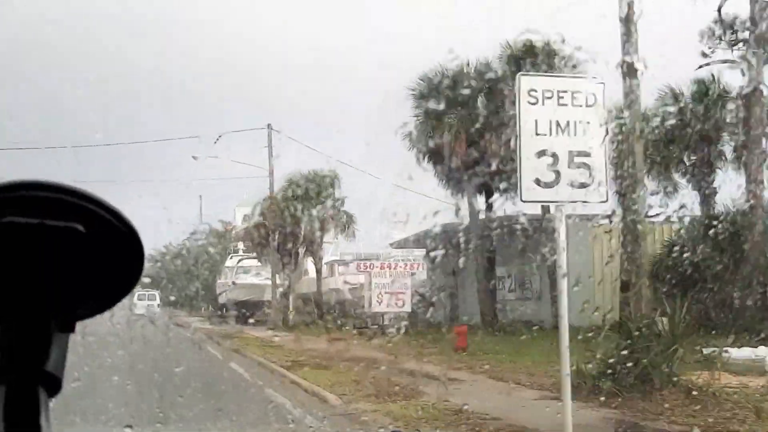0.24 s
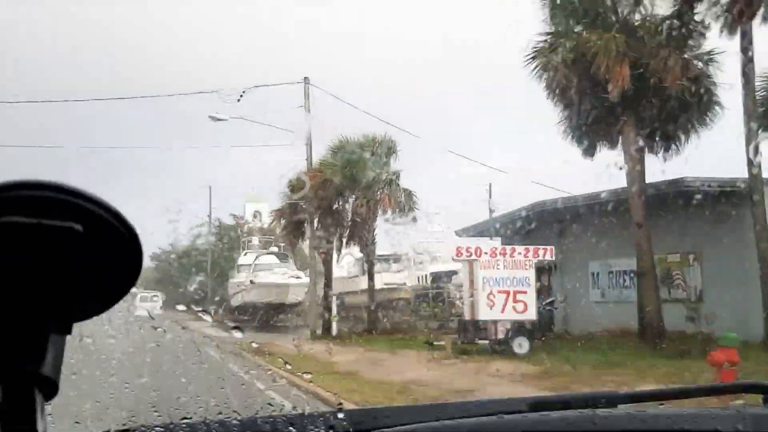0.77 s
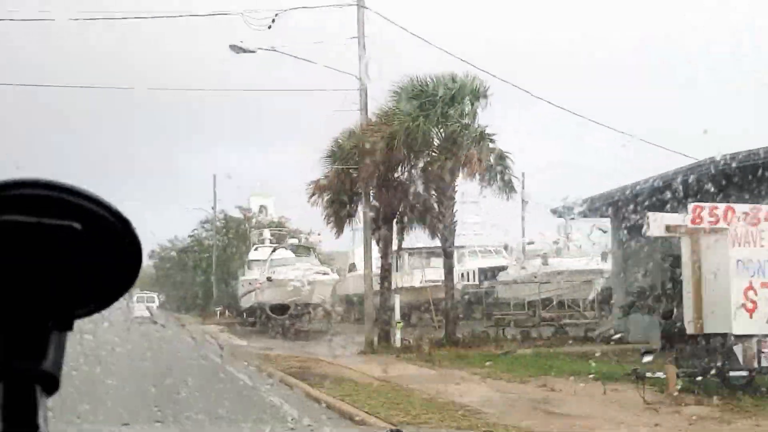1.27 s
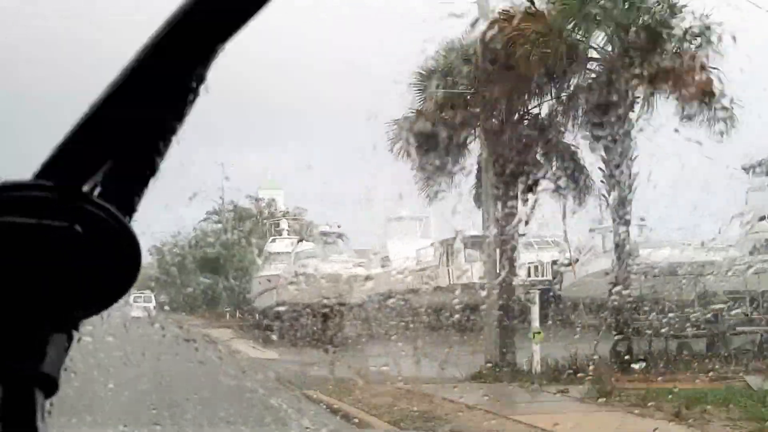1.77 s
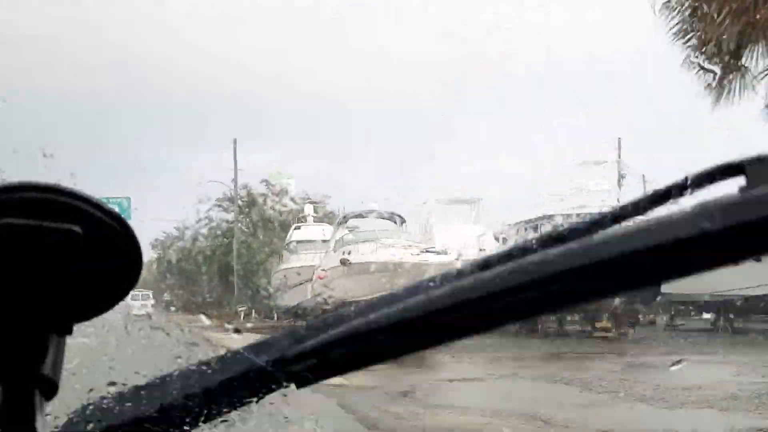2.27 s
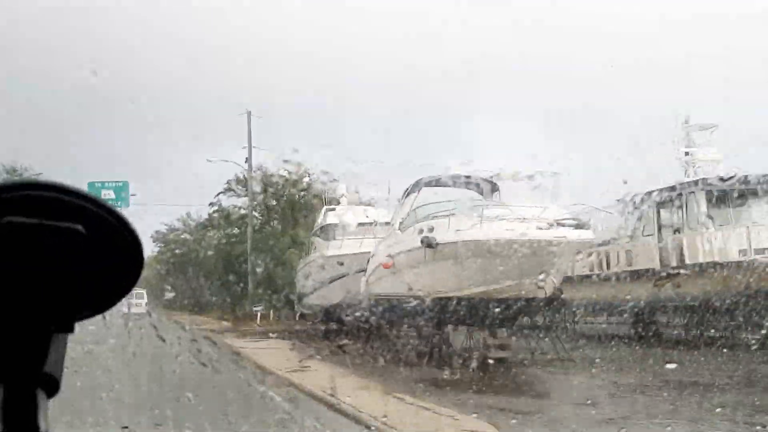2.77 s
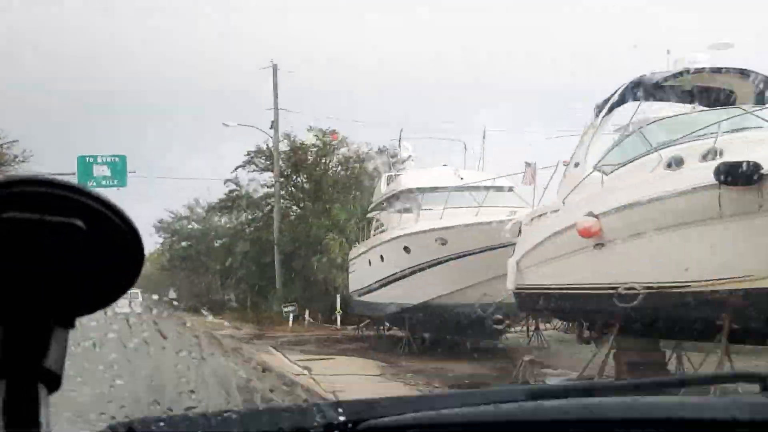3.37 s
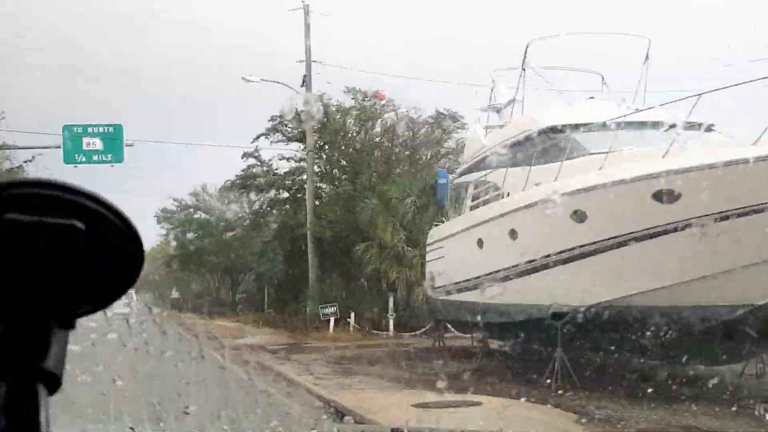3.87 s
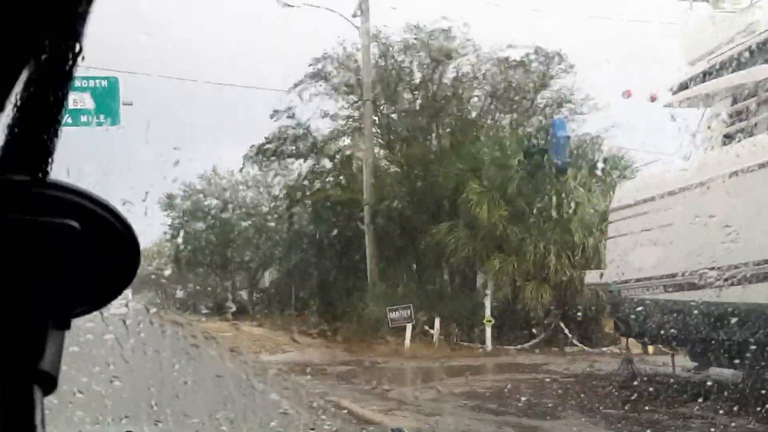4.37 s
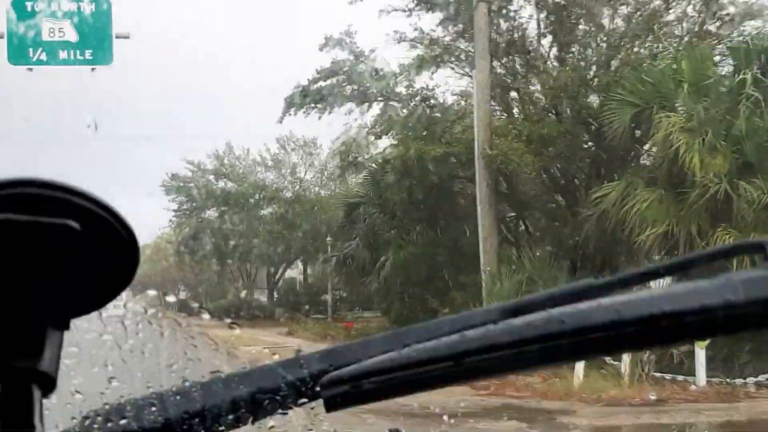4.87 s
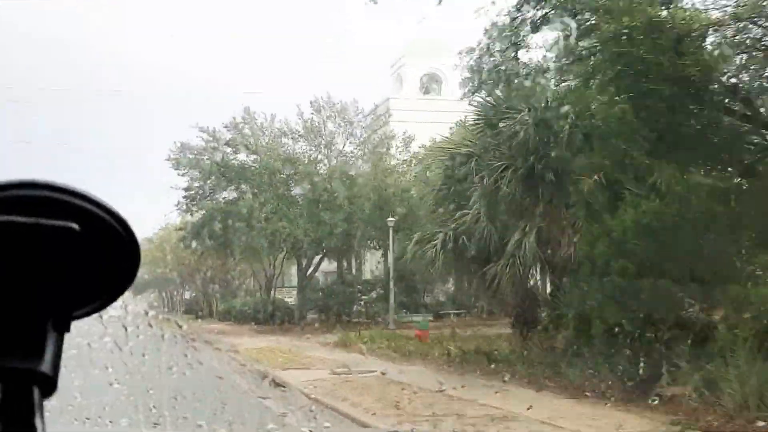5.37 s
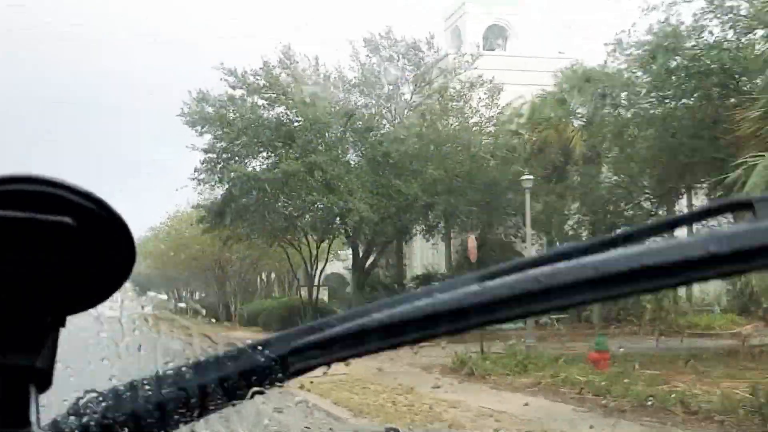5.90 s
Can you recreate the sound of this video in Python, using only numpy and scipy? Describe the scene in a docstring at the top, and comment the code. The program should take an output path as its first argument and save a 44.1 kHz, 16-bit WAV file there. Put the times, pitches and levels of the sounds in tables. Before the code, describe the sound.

Inside a moving car in steady rain, drops patter and sizzle on the glass over wet tyre wash, low rumble, a steady hum and road thuds.

```python
"""Inside a car driving through heavy rain on a wet road, heard in stereo.
Rain: thousands of random clicks, coloured by the glass, tick and sizzle in gusts; fat drops splat on top.
Road: shaped noise makes the tyre wash and the rumble; low resonances boom on rough patches, seams thud.
A wiper chirps once, as a short burst of ringing noise. The drive train hums, as sines at multiples
of one turning speed."""
import sys
import numpy as np
from scipy import signal
from scipy.fft import rfft, irfft
from scipy.io import wavfile
from scipy.ndimage import uniform_filter1d

SR = 44100
rng = np.random.default_rng(int(sys.argv[2]) if len(sys.argv) > 2 else 0)


def pcm_store(signal):
    """Save signal as 16-bit PCM."""
    levels = np.round(np.clip(np.atleast_2d(signal), -1, 1) * 32767)
    wavfile.write(sys.argv[1], SR, levels.astype(np.int16).T)


N = 270774
TIME = np.arange(N) / SR  # seconds

# Strength of the rain over time. Each row: time in seconds, level of the patter in dB.
RAIN_STRENGTH = [(0, -35), (.2, -38), (.55, -36), (.72, -38.5), (1.03, -37), (1.34, -41.5), (1.46, -37),
                 (1.65, -37), (2.0, -39.5), (2.65, -37.5), (3.6, -37), (3.8, -39), (4.33, -38),
                 (4.44, -40.5), (4.92, -43), (5.05, -39.5), (5.65, -41), (6.14, -39)]
# Gusts fling a sheet of drops at the glass, or hold it off. Each row: time in seconds, change in dB.
GUSTS = [(1.325, -2.5), (1.64, 1.5), (2.22, 2), (4.26, 2.5), (4.73, 5), (5.79, 3), (5.93, 1.5), (6.0, -2.5),
         (6.069, 4.5)]
# Sizes of drops. Each row: drops per second, average spread of strength in dB, share in dB.
DROP_SIZES = [(9160, 2.9, -0.5), (798, 2.5, -3.3)]
# Tone of the ticking drops. Each row: frequency in Hz, strength in dB.
PATTER_SPECTRUM = [(400, -24), (900, -8), (1300, -1), (1800, -4.5), (2600, 0), (3500, 0.5), (4500, 0),
                   (5500, -3), (6800, -7.5), (8100, -6), (8700, -17.5), (11000, -14.5), (16000, -33)]
# Tone of the fine sizzle as drops burst. Each row: frequency in Hz, strength in dB.
SPRAY_SPECTRUM = [(2000, -25), (5000, -3), (8000, -6), (8800, -6), (10000, -4.5), (11700, 0.5),
                  (13500, 0.5), (16000, -3.5)]
# Resonances of the windscreen. Each row: frequency in Hz, width in Hz, gain in dB.
GLASS_MODES = [(1529, 64, 6), (2033, 86, 4.5)]
# Tiny sharp drops close by. One row: drops per second, average spread of strength in dB,
# level in dB against the sizzle.
SHARP_DROPS = (260, 4.4, -8)
# Tone of the tiny sharp drops. Each row: frequency in Hz, strength in dB.
SHARP_DROP_SPECTRUM = [(5000, -29), (9000, -9), (12000, 1), (16000, 1)]
# Fat drops on the glass. Each row: start in seconds, tick level in dB, sizzle level in dB,
# left over right in dB.
FAT_DROPS = [(.732, -39, -40, 1), (0.9823, -36, -31, 11), (2.37, -38, -39, 0), (4.357, -28, -48, 0),
             (4.5124, -33, -40, 5), (4.593, -31, -40, 2), (5.0, -35, -32, 1.5), (5.5256, -35, -34, 3),
             (5.7557, -32, -37, -1), (5.792, -36, -46, 2), (5.9194, -37, -31, 1)]
# Coarseness of the road. Each row: time in seconds, tyre wash in dB, rumble in dB.
ROAD_SURFACE = [(0, -37.5, -29.5), (.7, -36.5, -30.5), (1.0, -35.5, -28), (1.25, -38, -31.5),
                (2.1, -39, -32), (2.9, -36.5, -28.5), (3.7, -36.5, -33), (4.2, -36, -29), (4.7, -37, -31),
                (5.3, -37.5, -31.5), (6.14, -37.5, -29.5)]
# Tone of the tyre wash. Each row: frequency in Hz, strength in dB.
WASH_SPECTRUM = [(150, -12), (300, 3), (440, -0.5), (580, 2), (700, 1), (890, -0.5), (1050, -4.5),
                 (1250, -14), (2000, -17), (5000, -46)]
# Tone of the road rumble. Each row: frequency in Hz, strength in dB.
RUMBLE_SPECTRUM = [(12, -32), (24, -24), (70, -4.5), (102, -0.5), (130, -2), (175, -3), (210, -2),
                   (260, -5), (320, -9.5), (380, -16.5), (520, -19.5), (1000, -60)]
# Booming of the body and cabin air. Each row: frequency in Hz, width in Hz, gain in dB.
BOOM_MODES = [(46.2, 4.7, -7.5), (58.1, 5.1, -3.5), (75, 13, -32)]
# Rough patches. Each row: start of full strength in seconds, its length in seconds, boom in dB.
ROUGH_PATCHES = [(.8, .45, -21.5), (4.296, 0.58, -32), (4.47, 0.15, -24)]
# Dips in the road rock the body briefly. Each row: time in seconds, boom in dB.
DIPS = [(.21, -46), (1.95, -30), (2.35, -28), (3.24, -29), (3.66, -23), (5.61, -29)]
# Seams in the road. Each row: start in seconds, thud level in dB, knock level in dB.
SEAMS = [(0.206, -18.5, -29), (0.808, -18, -26), (.826, -27, -21), (0.857, -14.5, -25), (0.894, -38, -28),
         (1.025, -15, -45), (2.864, -41, -29), (3.504, -25, -23.5), (4.481, -18, -26.5)]
# Tones a wheel impact sets ringing. Each row: frequency in Hz, time to fade by 60 dB in seconds,
# level in dB against the thud.
THUD_MODES = [(58.6, .25, 0), (105.3, 0.35, -3), (124.4, 0.14, -2.5), (174, 0.053, -2)]
# Tone of the knocking trim. Each row: frequency in Hz, strength in dB.
KNOCK_SPECTRUM = [(100, -8), (295, 14), (370, 8), (480, 4.5), (850, -7.5), (1300, -10), (2500, -11),
                  (6000, -52)]
# Chirp of the wiper rubber. One row: frequency in Hz, width in Hz, level in dB.
WIPER_CHIRP = (1520, 680, -31)
# Turning speed of the drive train. Each row: time in seconds, turns per second in Hz.
TURNING_SPEED = [(0, 47.62), (1.2, 48.23), (2, 48.34), (2.95, 48.82), (3.75, 49.4), (4.65, 48.59),
                 (5.9, 47.9), (6.14, 47.9)]
# The hum's fifth order, which rings in the cabin. Each row: time in seconds, level in dB.
FIFTH_ORDER = [(0, -32.5), (1.8, -31.5), (2.95, -28), (3.35, -30), (3.8, -29), (5.1, -27), (5.55, -29),
               (5.9, -31), (6.14, -30.5)]
# Weaker orders of the hum. Each row: multiple of the turning speed, level in dB.
WEAK_ORDERS = [(1, -36.5), (2, -39.5), (3, -39.5), (6, -48.5), (8, -58)]

GUST_S, DIP_S = 0.023, 0.036  # seconds from the peak of a swell until it is down to 37 %
FLUTTER_DB, FLUTTER_HZ = 0.5, 14  # the rain's own unevenness
# The spray follows the patter: its level at a usual patter level, and dB per dB beyond that.
USUAL_PATTER_DB, SPRAY_DB, SPRAY_FOLLOWS = -38, -46.5, 1.1
PATCH_ATTACK_S, PATCH_RELEASE_S, SMOOTH_ROAD_BOOM_DB = 0.085, 0.12, -35
LEFT_LEAD_S = 0.00045  # sound from the left reaches the right microphone this much later
WIPER_CHIRP_S = 4.477  # start in seconds
FIFTH_WAVER_DB = 0.7
# The seventh order: its mean level, and dB lost per dB that the fifth grows.
SEVENTH_DB, SEVENTH_YIELDS = -43.5, 1.58
CUTOFF_HZ = 15900


def rain():
    """Each drop gives a dull tick through the glass and a fine sizzle as it bursts."""
    patter_db, spray_db = rain_levels()
    hits = sum(from_db(db) * drops(per_s, spread_db) for per_s, spread_db, db in DROP_SIZES)

    ticks = rms_one(cabin(hits, t60=0.065, wet_db=0.5, pan_db=12))
    # drops on roof and bonnet merge into a hiss
    far = from_db(-8.5) * stereo_noise(0) + from_db(-8) * from_the_left()
    ring = resonate(stereo_noise(0), GLASS_MODES)
    patter = colour(ticks + far + ring, PATTER_SPECTRUM)

    sizzle = colour(cabin(hits, t60=0.016, wet_db=-4, pan_db=25), SPRAY_SPECTRUM)
    per_s, spread_db, sharp_db = SHARP_DROPS
    sharp_hits = cabin(drops(per_s, spread_db), t60=0.012, wet_db=-10, pan_db=15)
    sharp = from_db(sharp_db) * colour(sharp_hits, SHARP_DROP_SPECTRUM)

    # both lean a little to the left
    return from_db(patter_db) * patter * pan(0.81) + from_db(spray_db) * (sizzle + sharp) * pan(2.8)


def rain_levels():
    """Patter and spray in dB: both follow the rain and its gusts; the spray flutters more."""
    strength_db, = in_time(RAIN_STRENGTH)
    gusts_db = sum(db * swell(s, GUST_S) for s, db in GUSTS)
    patter_db = strength_db + gusts_db + FLUTTER_DB * drift(FLUTTER_HZ)
    spray_db = SPRAY_DB + SPRAY_FOLLOWS * (patter_db - USUAL_PATTER_DB) + 0.9 * drift(FLUTTER_HZ)
    return patter_db, spray_db


def drops(per_s, spread_db, count=10):
    """Drops land at chance moments, as clicks of random strength dealt to patches across the glass."""
    chance = per_s * from_db(1.5 * drift(15)) / SR  # the rate itself wanders
    at = np.flatnonzero(rng.random(N) < chance)
    strength = from_db(spread_db * np.minimum(rng.exponential(1, N), 4.5))
    size = strength * rng.choice([-1, 1], N)
    patch = rng.integers(0, count, N)
    clicks = np.zeros((count, N))
    clicks[patch[at], at] = size[at]
    return rms_one(clicks)


def cabin(patches, t60, wet_db, pan_db):
    """Each patch of glass has its own direct path and its own reflections to the two microphones."""
    age = TIME[:SR // 20]
    out = 0
    for place, clicks in zip(np.linspace(-1, 1, len(patches)), patches):  # from right to left
        # reflections: fading noise that starts after a millisecond
        path = rng.standard_normal((2, len(age))) * from_db(-60 * age / t60) * (age > 0.001)
        path *= from_db(wet_db) / np.sqrt(np.sum(path ** 2, axis=1, keepdims=True))
        # direct sound: the nearer microphone hears it some samples sooner
        lag = round(place * 12)
        path[[0, 1], [12 - lag, 12 + lag]] += 1
        path = path * pan(pan_db * place)
        out = out + signal.oaconvolve(clicks[None], path, axes=1)[:, :N]
    return out


def splats():
    """A fat drop ticks through the windscreen and scatters for a few milliseconds."""
    tick = sum(from_db(db) * pan(side) * burst(s, 0.00016, 0.033) for s, db, _, side in FAT_DROPS)
    sizzle = sum(from_db(db) * pan(side) * burst(s, 0.00033, 0.016) for s, _, db, side in FAT_DROPS)
    ticking = tick * colour(stereo_noise(0), PATTER_SPECTRUM)
    return ticking + sizzle * colour(stereo_noise(0), SPRAY_SPECTRUM)


def road():
    """The rough surface shakes the body, while the tyres throw up water."""
    wash_db, rumble_db = in_time(ROAD_SURFACE)
    wash_noise = stereo_noise(0) + from_db(-7) * from_the_left()
    wash = from_db(wash_db) * colour(wash_noise, WASH_SPECTRUM)
    rumble = from_db(rumble_db) * colour(stereo_noise(-11), RUMBLE_SPECTRUM)
    return wash + rumble + boom() + bumps()


def boom():
    """Shaking makes the body and the cabin air resonate at a few low pitches."""
    shake = resonate(stereo_noise(-24), BOOM_MODES)
    # even out the strength, so that jolting() alone sets it
    shake /= np.sqrt(uniform_filter1d(np.mean(shake ** 2, axis=0), SR // 12))
    band = signal.butter(4, [34, 95], "band", fs=SR, output="sos")
    return signal.sosfiltfilt(band, jolting() * shake)


def jolting():
    """How hard the road shakes the body: a wandering base, rough patches and dips."""
    base = from_db(SMOOTH_ROAD_BOOM_DB + 2.6 * drift(4.5))
    patches = sum(from_db(db) * held(s, length, PATCH_ATTACK_S, PATCH_RELEASE_S)
                  for s, length, db in ROUGH_PATCHES)
    dips = sum(from_db(db) * swell(s, DIP_S) for s, db in DIPS)
    return base + patches + dips


def bumps():
    """A seam sets the body's modes ringing and knocks the trim."""
    thud = 0
    for s, db, _ in SEAMS:
        for hz, t60, mode_db in THUD_MODES:
            tone = np.sin(2 * np.pi * hz * (TIME - s))
            thud = thud + from_db(db + mode_db) * burst(s, 0.0023, t60) * tone
    knock = sum(from_db(db) * burst(s, 0.0028, 0.1) for s, _, db in SEAMS)
    return thud + knock * colour(stereo_noise(-5.5), KNOCK_SPECTRUM)


def wiper():
    """The rubber catches on the glass for a moment and rings."""
    hz, width, db = WIPER_CHIRP
    band = [(hz, width, 0)]
    ring = rms_one(resonate(resonate(stereo_noise(0), band), band))
    return from_db(db) * burst(WIPER_CHIRP_S, 0.0056, 0.086) * ring


def hum():
    """Orders (multiples) of one turning speed, all wavering; the fifth rings in the cabin."""
    hz, = in_time(TURNING_SPEED)
    fifth_db, = in_time(FIFTH_ORDER)
    seventh_db = SEVENTH_DB - SEVENTH_YIELDS * (fifth_db - fifth_db.mean())
    turn = 2 * np.pi * np.cumsum(hz) / SR  # angle in radians
    out = from_db(fifth_db + FIFTH_WAVER_DB * drift(3)) * np.sin(5 * turn)
    out += from_db(seventh_db + 1.96 * drift(3.4)) * np.sin(7 * turn + 0.39 * drift(5))
    for order, db in WEAK_ORDERS:
        out += from_db(db + 0.54 * drift(4.4)) * np.sin(round(order) * turn + 0.5 * drift(1.4))
    return np.sqrt(2) * out  # a sine's rms is its peak over root 2


def from_the_left():
    """Noise from the left side, heard first by the left microphone."""
    noise = rng.standard_normal(N)
    return np.array([noise, np.roll(noise, round(LEFT_LEAD_S * SR))])


def stereo_noise(side_db):
    """White noise at two microphones; the weaker the side, the more alike they are."""
    mid, side = rng.standard_normal((2, N))
    return rms_one(mid + from_db(side_db) * side * [[1], [-1]])


def resonate(x, modes):
    """Parallel resonances, each with its own gain at its peak; narrow ones ring longer."""
    out = 0
    for hz, width, db in modes:
        r = np.exp(-np.pi * width / SR)
        feedback = [1, -2 * r * np.cos(2 * np.pi * hz / SR), r * r]
        gain = from_db(db) * (1 - r * r) / 2
        out = out + gain * signal.lfilter([1, 0, -1], feedback, x)
    return out


def colour(x, spectrum):
    """Filter x by a smooth curve over frequency, then set its rms to 1."""
    hz, db = np.transpose(spectrum)
    bins = np.maximum(np.arange(N // 2 + 1) * SR / N, 1)
    gain = from_db(np.interp(np.log(bins), np.log(hz), db))
    return rms_one(irfft(rfft(x) * gain, N))


def drift(rate_hz):
    """Slow random wandering around zero, with rms 1."""
    bins = np.arange(N // 2 + 1) * SR / N
    return rms_one(irfft(rfft(rng.standard_normal(N)) / (1 + (bins / rate_hz) ** 2), N))


def burst(start, rise_s, t60):
    """Envelope of a blow: a quick rise, and a steady decay of 60 dB in t60 seconds."""
    age = np.maximum(TIME - start, 0)
    return (1 - np.exp(-age / rise_s)) * from_db(-60 * np.minimum(age / t60, 4))


def swell(centre, half_s):
    """A smooth rise and fall of height 1."""
    return np.exp(-((TIME - centre) / half_s) ** 2)


def held(start, length, attack_s, release_s):
    """Rise before the start, hold at 1 for the length, then fall."""
    rise = 1 + (TIME - start) / attack_s
    fall = 1 - (TIME - start - length) / release_s
    return np.clip(np.minimum(rise, fall), 0, 1)


def in_time(rows):
    """Each column of a table after its time, drawn as a line through every sample."""
    s, *columns = np.transpose(rows)
    return [np.interp(TIME, s, column) for column in columns]


def pan(db):
    """Left and right gains; the left is louder by this many dB."""
    return from_db(np.array([[0.5], [-0.5]]) * db)


def from_db(db):
    """Decibels to a plain factor."""
    return 10 ** (np.asarray(db) / 20)


def rms_one(x):
    """Scale to an rms (average strength) of 1."""
    return x / np.sqrt(np.mean(x ** 2) + 1e-20)


def scene():
    """All sources together."""
    return rain() + splats() + road() + wiper() + hum()


def record(dry):
    """The top is cut steeply."""
    return signal.sosfilt(signal.ellip(12, 0.1, 90, CUTOFF_HZ, fs=SR, output="sos"), dry)


dry = scene()
out = record(dry)
pcm_store(out)
```